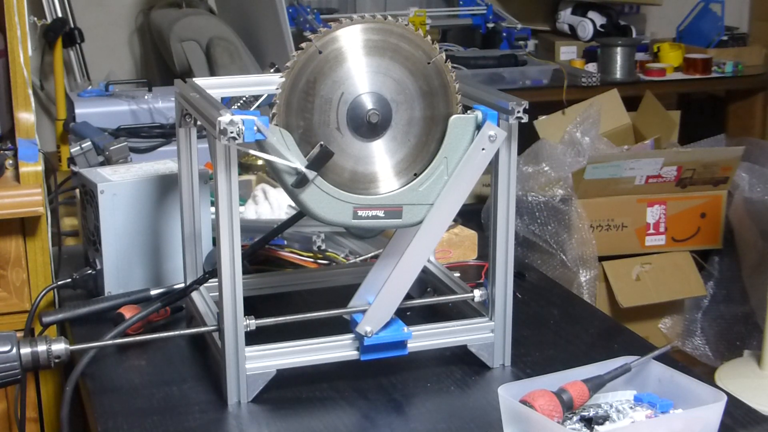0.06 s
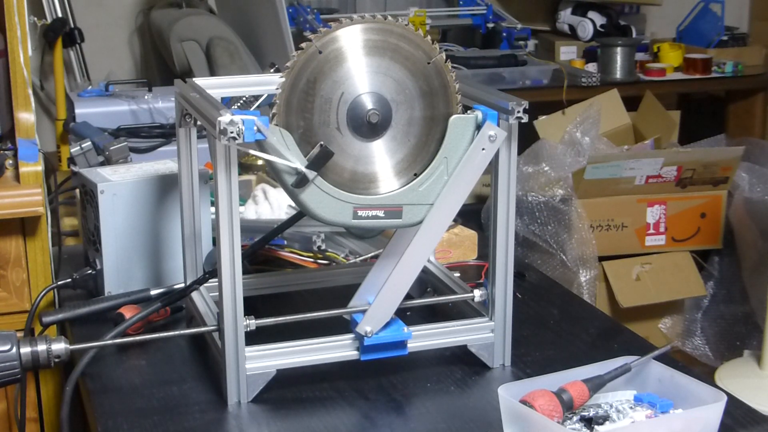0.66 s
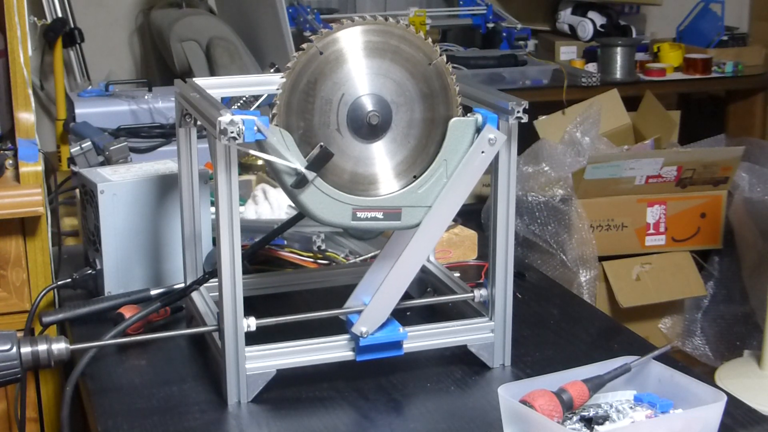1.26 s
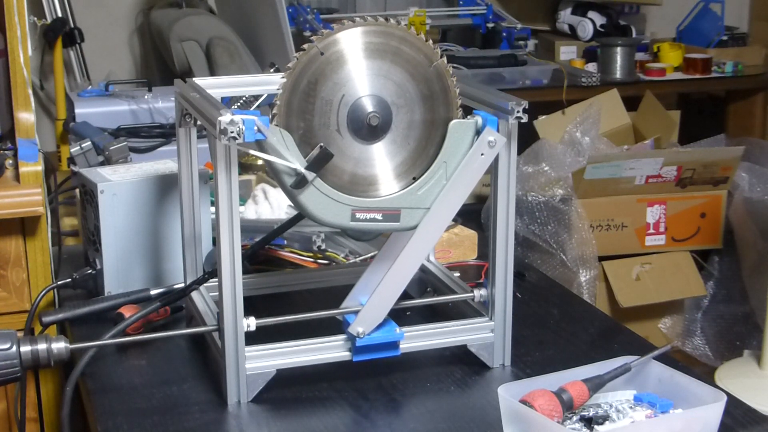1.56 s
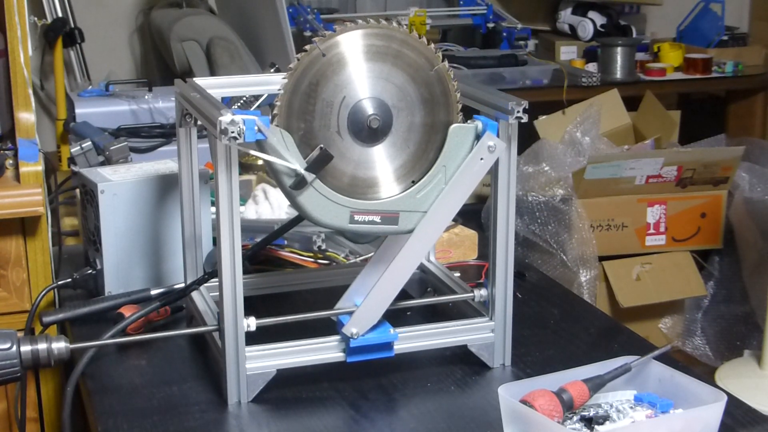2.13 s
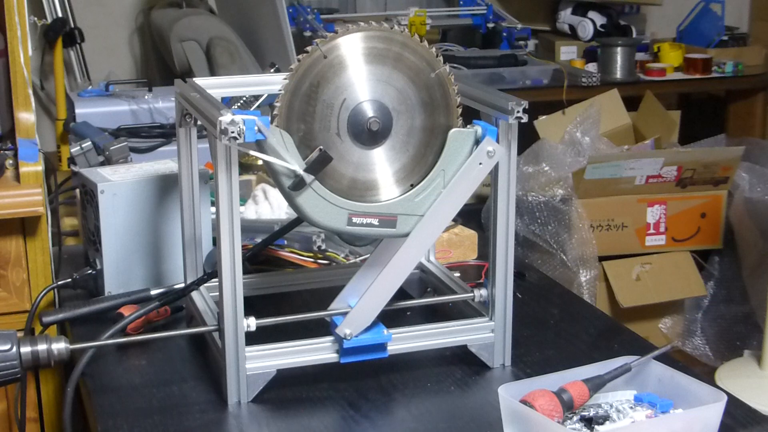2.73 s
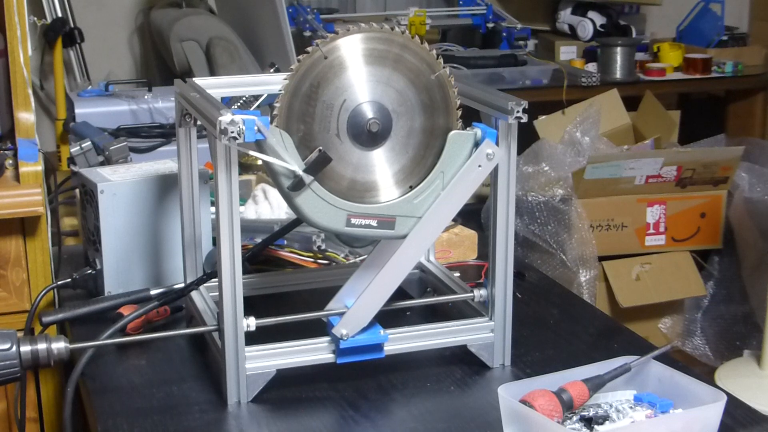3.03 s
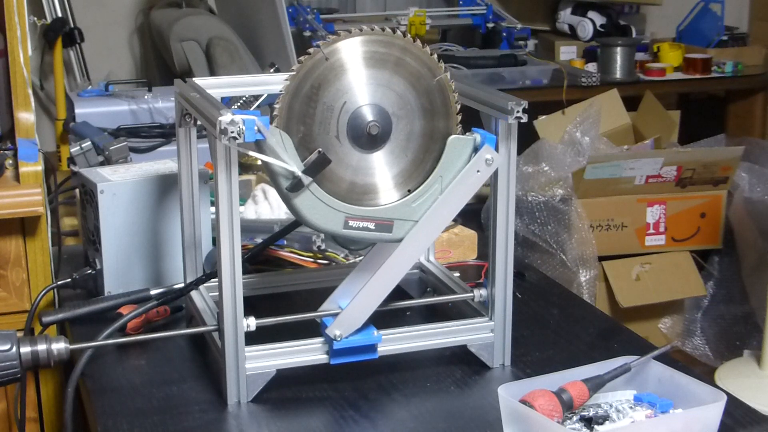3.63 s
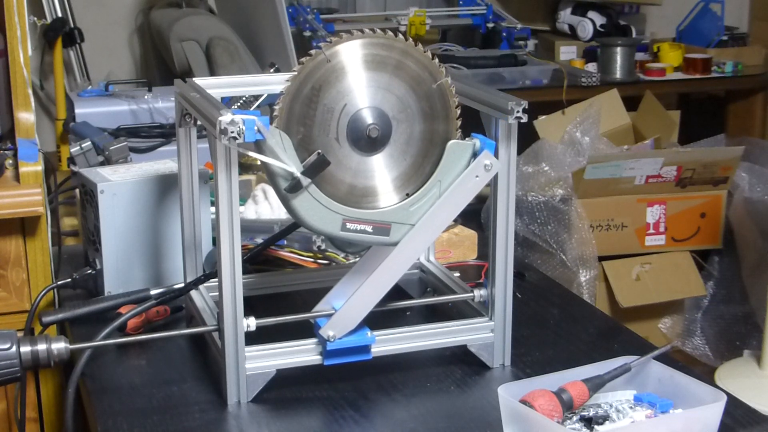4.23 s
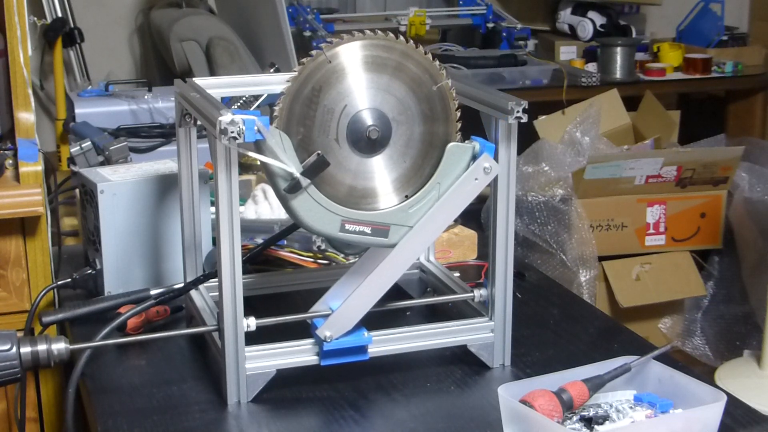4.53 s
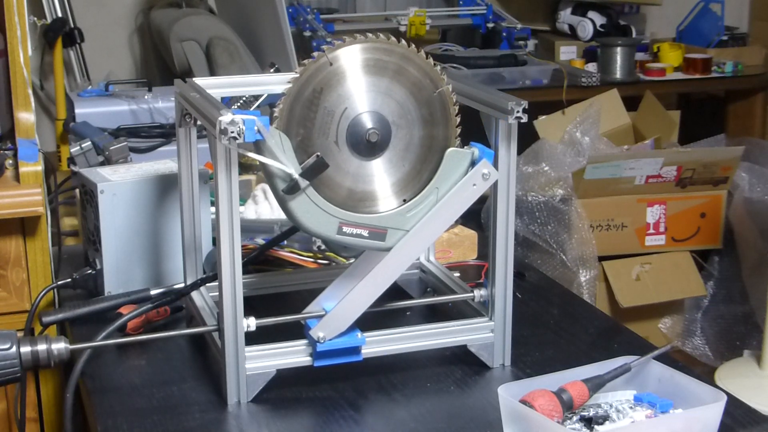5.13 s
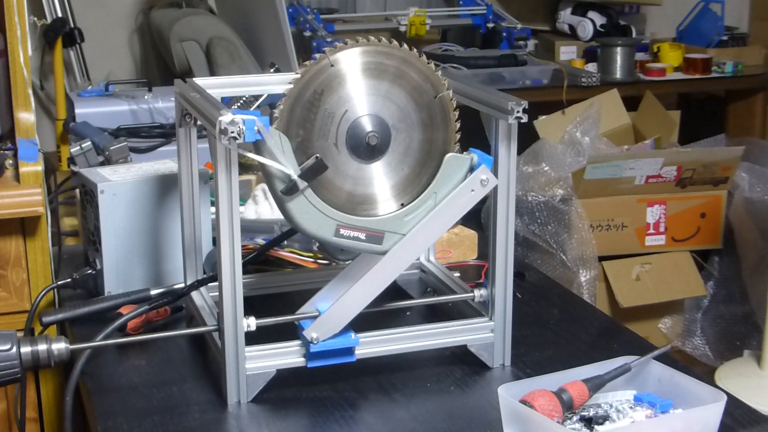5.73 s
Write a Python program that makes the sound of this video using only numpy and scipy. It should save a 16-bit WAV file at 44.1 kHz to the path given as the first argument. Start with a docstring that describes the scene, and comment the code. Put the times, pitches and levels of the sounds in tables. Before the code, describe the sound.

For the first 0.8 seconds there is only faint workshop air with a slight fan hum. At about 0.8 seconds an electric drill starts abruptly, rising to full speed in a quarter second. It then runs loudly at a nearly constant pitch, a whine of many tones over a bright, gritty gear rasp that pulses slightly, about nine times a second. A gear hum swells briefly near 1 and 1.3 seconds. The threaded rod it turns chatters with a high metallic ring, strongest between 2 and 3 seconds and again near 5. The metal frame rattles, with light, rapid knocks from about 1 to 3.3 seconds, thumping most after 2, then fainter from 3.5 to 5.6. The drill is still running at the end, around 6 seconds. It sounds close and slightly left, in a small, dry room.

```python
"""Drill turning a threaded rod

In a small workshop an electric drill spins a long rod that tilts a saw blade in an aluminium frame.
The motor runs up in a quarter second and whines on its shaft orders. Teeth and brushes excite housing
and frame resonances, swelling once per chuck turn, while the rod rings in its nut and knocks the frame."""
import sys
import numpy as np
from scipy import signal
from scipy.fft import rfft, irfft, next_fast_len
from scipy.io import wavfile
from scipy.ndimage import uniform_filter1d

SR = 44100
rng = np.random.default_rng(int(sys.argv[2]) if len(sys.argv) > 2 else 0)


def generate_wav(sig):
    """Save sig (samples, or channels by samples) to the path in sys.argv[1] as 16-bit PCM at SR."""
    pcm = np.round(np.clip(np.atleast_2d(sig).T, -1, 1) * 32767).astype(np.int16)
    wavfile.write(sys.argv[1], SR, pcm)


N = 263277
TIME = np.arange(N) / SR
FFT_SIZE = next_fast_len(N + SR)
FREQ = np.arange(FFT_SIZE // 2 + 1) * SR / FFT_SIZE
GEAR_RATIO = 36  # motor turns per chuck turn


def undb(db):
    """Amplitude ratio of a level in decibels."""
    return 10 ** (np.asarray(db) / 20)


def unit(x):
    """Normalisation to rms 1."""
    return x / np.sqrt(np.mean(x ** 2))


def curves(table):
    """Linear interpolation of each column over time."""
    times, *columns = np.transpose(table)
    return [np.interp(TIME, times, column) for column in columns]


def colour(points):
    """Spectral envelope: gain interpolated over log frequency."""
    hz, db = np.transpose(points)
    return undb(np.interp(np.log(FREQ + 1), np.log(hz), db))


def mode(hz, width):
    """Response of a damped oscillator, gain 1 at resonance."""
    return 1j * FREQ * width / (hz ** 2 - FREQ ** 2 + 1j * FREQ * width)


def resonances(modes):
    """Resonators in cascade: peaks and dips on a flat response."""
    return np.prod([1 + (undb(db) - 1) * mode(hz, width) for hz, width, db in modes], axis=0)


def through(x, response):
    """Linear filtering: the spectrum times a frequency response."""
    return irfft(rfft(x, FFT_SIZE) * response, FFT_SIZE)[..., :N]


def noise(spectrum):
    """Spectrally shaped Gaussian noise, rms 1."""
    return unit(through(rng.standard_normal(N), colour(spectrum)))


def walk(rate_hz):
    """Smooth random fluctuation, rms 1."""
    hold = max(int(SR / rate_hz), 1)
    steps = np.repeat(rng.standard_normal(N // hold + 1), hold)[:N]
    return unit(uniform_filter1d(steps, hold))


# air noise, mid and side: (frequency [Hz], relative spectral density [dB])
AIR_MID = [(30, -19), (80, -23), (130, -6), (190, 0.5), (270, -3), (450, -2.5), (650, -6.5), (1000, -11.5),
           (1200, -11), (1800, -14.5), (3000, -17), (7000, -14.5), (11000, -18.5), (15500, -25)]
AIR_SIDE = [(18, -45), (30, -15), (64, -25), (120, -17), (249, -23), (307, -8), (369, -14), (546, -4),
            (639, -11), (1200, -6), (3150, -20), (9190, -23), (15500, -31)]
# fan tones: (frequency [Hz], relative level [dB])
FAN_HUM = [(204.6, -78), (479.1, -71), (721.4, -84), (1357, -80)]
def room_tone(mid_db=-57, side_db=-58, hum_db=4.5):
    """Diffuse field: faint, partly correlated air noise, with the hum of a small fan."""
    mid = undb(mid_db) * noise(AIR_MID)
    side = undb(side_db) * noise(AIR_SIDE)
    hum = sum(undb(db + hum_db + 1.5 * walk(5.7)) * np.sin(2 * np.pi * hz * TIME) for hz, db in FAN_HUM)
    return np.array([mid + side, mid - side]) + hum


def binding(turns, depth, at):
    """Runout: the rod binds once per chuck turn, peaking at the fraction `at` of the turn."""
    return depth * np.cos(2 * np.pi * (turns / GEAR_RATIO - at))


# cruising speed of the motor: (time [s], nominal shaft rate [Hz])
CRUISE = [(1.2, 319.5), (1.6, 319.4), (1.75, 320.4), (2.05, 321.2), (2.25, 320.1), (2.45, 321.1),
          (2.85, 321.0), (3.0, 320.2), (3.2, 321.3), (3.55, 319.4), (3.85, 321.4), (4.7, 321.5),
          (5.05, 320.3), (5.97, 320.7)]
def shaft(trigger_s=.806, run_up_s=.118, sag_hz=0.44, hunt_hz=0.164):
    """Turns as the integral of speed: the motor runs up, hunts at random and sags as the rod binds."""
    cruise_hz, = curves(CRUISE)
    hz = cruise_hz * np.tanh(np.maximum(TIME - trigger_s, 0) / run_up_s)
    sag = binding(np.cumsum(hz) / SR, sag_hz, at=.7)
    deviation = (hunt_hz * walk(18) - sag) / cruise_hz
    return np.cumsum(hz * (1 + deviation)) / SR


# tones of fan, gear mesh and commutator: (order [multiple of shaft rate], relative level [dB])
SHAFT_ORDERS = [(1, -50), (2.5, -42.5), (4, -48), (5, -45.5), (6.25, -45.5), (7.5, -44.5), (10, -40.5),
                (11.33, -47), (12, -40), (14.6, -42), (18, -40.5), (23, -48), (24, -37), (25, -57),
                (27, -47), (36, -44.5), (37, -47), (48, -41.5)]
# gear hum, strongest as the drive accelerates and takes up the load: (time [s], gain [dB])
MESH_STRAIN = [(.92, 1), (.975, 13), (1.02, 6.5), (1.15, -1), (1.3, 10), (1.7, 1.5), (5.97, -5)]
# commutator tones flare and fade as they drift over these: (frequency [Hz], bandwidth [Hz], gain [dB])
HOUSING_MODES = [(7620, 26, 5), (7670, 12, 10), (7713, 24, -7), (11300, 260, 5)]
# small parts radiate little bass: (frequency [Hz], gain [dB])
RADIATION = [(80, -19), (280, 2)]
def whine(turns, mesh_order=2.5, flutter_db=2.5, twist_rad=0.023, comb_db=-53):
    """Rotational harmonics: tones locked to the shaft, modulated by bearing play and the binding rod."""
    angle = 2 * np.pi * turns + twist_rad * walk(70)
    strain_db, = curves(MESH_STRAIN)
    mesh_db = strain_db + binding(turns, 1.5, at=0.43)
    bind_db = binding(turns, 1.0, at=0.76)
    tones = np.zeros(N)
    for order, db in SHAFT_ORDERS:
        if order == mesh_order:  # backlash makes the loaded gear mesh rough
            tones += undb(db + mesh_db + 2.9 * walk(130)) * np.sin(order * angle + 0.84 * walk(120))
        else:
            tones += undb(db + bind_db + flutter_db * walk(35)) * np.sin(order * angle)
    for order in range(6, 44):  # uneven commutator bars add a faint comb
        gain = undb(comb_db + 2 * rng.standard_normal() - order / 10)
        tones += gain * np.sin(order * angle + rng.uniform(0, 2 * np.pi))
    return np.sqrt(2) * through(tones, resonances(HOUSING_MODES) * colour(RADIATION))


def contacts(turns, count, depth, scatter_db):
    """Contact noise: teeth strike and scrape `count` times a turn, each with its own force."""
    tooth = turns * count
    force = undb(scatter_db * rng.standard_normal(N))[tooth.astype(int)]
    return force * (1 + depth * np.cos(2 * np.pi * tooth)) * rng.standard_normal(N)


# modes of frame and gear case: (frequency [Hz], bandwidth [Hz], gain [dB])
BODY_MODES = [(164.2, 18, 11.5), (310.7, 20, 9.5), (644, 22, 7), (786, 22, 1), (862, 76, 10), (1210, 24, 6),
              (1295, 17, 2.5), (1880, 16, 3), (1870, 31, 2), (2124, 53, 3), (2416, 24, 9), (2540, 51, 7),
              (3645, 58, 4), (4087, 80, 6), (4530, 18, 4), (4690, 17, 5.5), (6220, 310, 4)]
# excitation of gear rasp and frame rattle: (frequency [Hz], relative spectral density [dB])
RASP = [(300, -55), (900, -15), (1400, -8), (1800, -1.5), (2300, -5), (2800, -1), (3700, -3), (4500, -0.5),
        (5900, -4), (7000, -6), (10000, -5), (12500, -14), (15500, -17.5)]
RATTLE = [(25, -35), (60, -30), (110, -25), (150, -17.5), (215, -13), (280, -4.5), (400, 1), (600, -1.5),
          (900, 0), (1300, -3.5), (2000, -26), (4000, -42)]
# how hard the drive labours, as relative levels: (time [s], rasp [dB], rattle [dB], rod ring [dB])
LOAD = [(1.0, -22.5, -30.5, -28.5), (1.45, -21, -30, -29.5), (1.95, -23, -30.5, -25.5),
        (2.3, -22, -29.5, -25.5), (2.8, -22, -29.5, -24), (3.1, -22.5, -30.5, -26.5),
        (3.55, -23.8, -31.4, -26.5), (4.15, -22, -30.5, -27.5), (4.4, -23, -32, -27),
        (4.85, -22, -30.5, -25), (5.3, -21.5, -29.5, -26.5), (5.97, -22, -32, -28.9)]
def gears(turns, rasp_trim_db=3.08, rattle_trim_db=-0.5):
    """Forced vibration: teeth and brushes rasp in the gear case; slower blows rattle the frame."""
    rasp_db, rattle_db, _ = curves(LOAD)
    body = resonances(BODY_MODES)
    teeth = contacts(turns, count=5, depth=0.12, scatter_db=0.57)
    blows = contacts(turns, count=1, depth=0.31, scatter_db=0.65)
    rasp = unit(through(teeth, colour(RASP) * body))
    rattle = unit(through(blows, colour(RATTLE) * body))
    rasp *= undb(rasp_db + rasp_trim_db + binding(turns, 0.82, at=0.54) + 0.38 * walk(30))
    rattle *= undb(rattle_db + rattle_trim_db + binding(turns, 0.5, at=0.42) + 0.94 * walk(25))
    return rasp + rattle


# modes of the rod: (frequency [Hz], bandwidth [Hz], relative gain [dB])
ROD_MODES = [(3060, 17, -6), (3124, 17, 0), (3230, 16, -9), (3247, 19, 1), (3285, 25, -7.5)]
def rod(turns, trim_db=-0.5, wander_db=1.0):
    """Modal resonance: the thread chatters in its nut in short spurts and rings the rod."""
    _, _, ring_db = curves(LOAD)
    chatter = contacts(turns, count=1, depth=0.53, scatter_db=2.0)
    chatter *= undb(0.91 * walk(40) + binding(turns, 0.9, at=0.29))
    response = sum(undb(db) * mode(hz, width) for hz, width, db in ROD_MODES)
    ring = unit(through(chatter, response))
    return ring * undb(ring_db + trim_db + wander_db * walk(10))


# spectra of bench top and linkage: (frequency [Hz], relative spectral density [dB])
THUMP = [(70, -42), (130, -22), (154, 6.5), (170, 9), (200, -6.5), (260, -37), (600, -60)]
CLATTER = [(150, -34), (250, -10.5), (305, 3.5), (360, -7), (560, 0.5), (750, -10), (2000, -44)]
# bouts of knocking, at relative levels: (start [s], end [s], phase [turns], thump [dB], clatter [dB])
BOUTS = [(.95, 1.95, 0.5, -50, -35.5), (2.1, 2.75, 0.05, -41, -33.5), (2.75, 3.3, .05, -54, -32.5),
         (3.5, 4.8, 0.51, -51, -42), (4.8, 5.6, 0.43, -50, -43)]
def knocks(turns, rise_s=0.012, scatter_db=0.3):
    """Periodic impact: the whipping rod hits the frame; the bench thumps, the loose linkage clatters."""
    thump, clatter = noise(THUMP), noise(CLATTER)
    chuck_turns = turns / GEAR_RATIO
    sound = np.zeros(N)
    for start, end, phase, thump_db, clatter_db in BOUTS:
        timbre = undb(thump_db) * thump + undb(clatter_db) * clatter
        onsets = np.interp(np.arange(int(chuck_turns[-1])) + phase, chuck_turns, TIME)  # one a turn
        for onset in onsets[(onsets > start) & (onsets < end)]:
            age = np.maximum(TIME - onset, 0) / rise_s
            force = undb(scatter_db * rng.standard_normal())
            sound += force * age * np.exp(1 - age) * timbre
    return sound


def reflections(t60_s):
    """Reverberation: the response of a dense exponential tail, 3 ms behind the direct sound."""
    tail = rng.standard_normal(N) * undb(-60 * TIME / t60_s) * (TIME > .003)
    return rfft(tail / np.sqrt(np.sum(tail ** 2)), FFT_SIZE)


# lean to the left: (frequency [Hz], left minus right [dB])
PAN = [(900, 0), (1250, 2.5), (1600, 2), (2500, 1), (3000, 3), (4200, 2), (8000, 3), (12000, 3.5),
       (15000, 2)]
# diffuse reflections: (frequency [Hz], side gain [dB])
WIDTH = [(30, -3), (90, -16), (170, -35), (310, -43), (500, -26.5), (850, -15), (1230, -10), (1900, -17),
         (5000, -13.5), (9000, -12), (14000, -5.5)]
def workshop(drill, wet_db=-12, t60_s=0.16):
    """A level difference places the drill to the left; uncorrelated reflections widen it."""
    mid = through(drill, 1 + undb(wet_db) * reflections(t60_s))
    side = through(drill, colour(WIDTH) * reflections(t60_s))
    lean = np.sqrt(colour(PAN))
    return np.array([through(mid + side, lean), through(mid - side, 1 / lean)])


# trigger click, first jolt of the gears and run-up: (time [s], gain [dB])
ONSET = [(0, -90), (.806, -84), (.811, -33), (.825, -29), (.831, -12), (.85, -7), (.868, -11), (.895, -6),
         (.916, -5.5), (.925, -1), (1.0, -.5)]
def scene():
    """Superposition: four sources share one shaft and one onset, over the room tone."""
    turns = shaft()
    onset_db, = curves(ONSET)
    drill = whine(turns) + gears(turns) + rod(turns) + knocks(turns)
    return workshop(drill * undb(onset_db)) + room_tone()


# notch of the microphone port: (frequency [Hz], bandwidth [Hz], gain [dB])
PORT_NOTCH = [(9020, 510, -9)]
def record(dry, cutoff_hz=15650):
    """Band limiting: the microphone port notches the treble and a steep low-pass cuts the top."""
    notched = through(dry, resonances(PORT_NOTCH))
    low_pass = signal.ellip(12, .2, 80, cutoff_hz, fs=SR, output="sos")
    return signal.sosfilt(low_pass, notched)


dry = scene()
out = record(dry)
generate_wav(out)
```